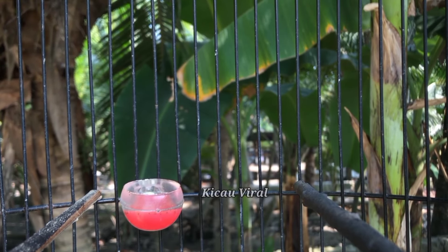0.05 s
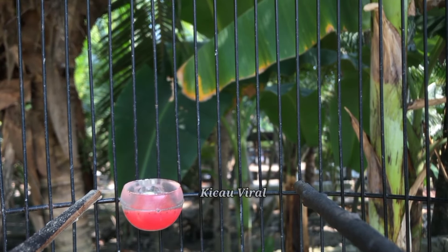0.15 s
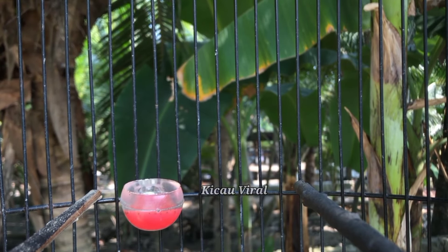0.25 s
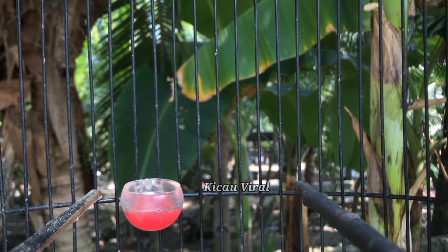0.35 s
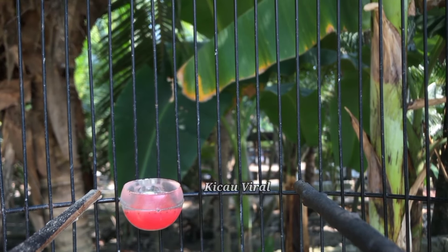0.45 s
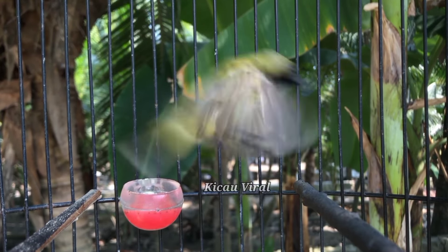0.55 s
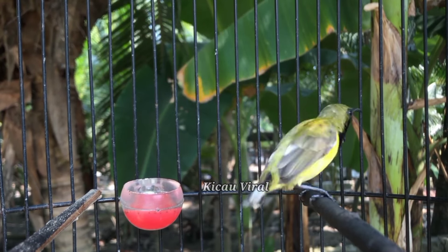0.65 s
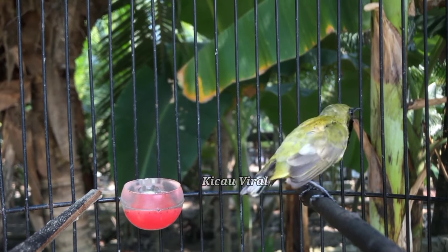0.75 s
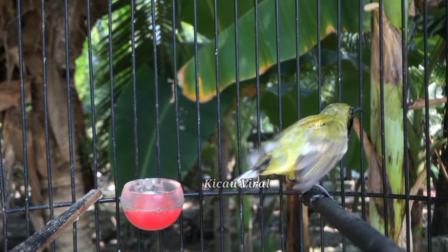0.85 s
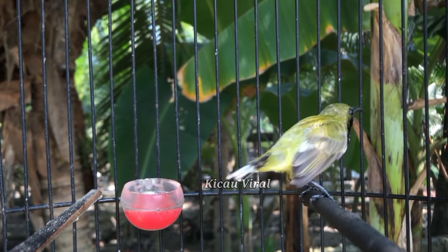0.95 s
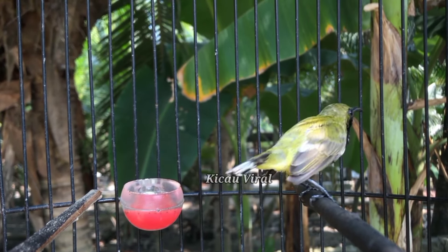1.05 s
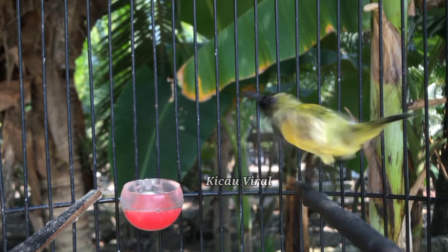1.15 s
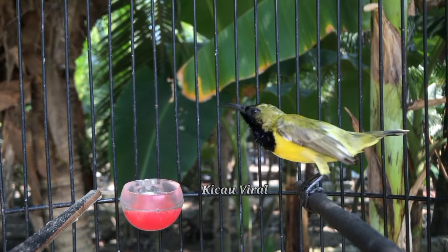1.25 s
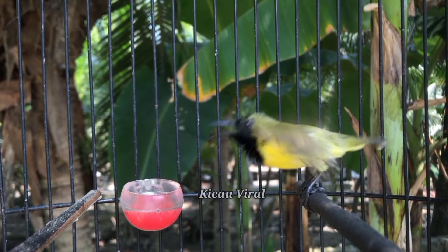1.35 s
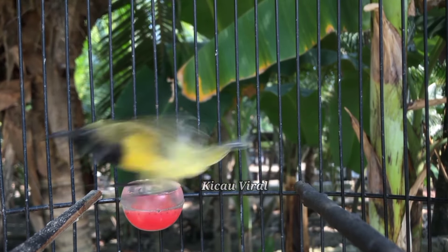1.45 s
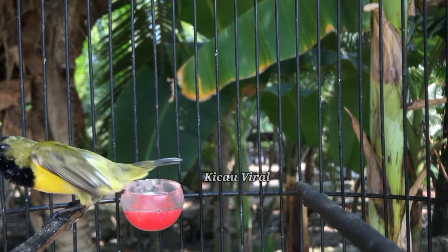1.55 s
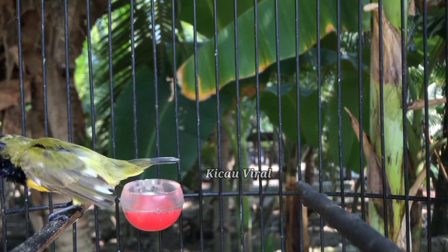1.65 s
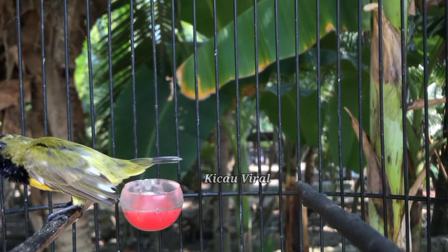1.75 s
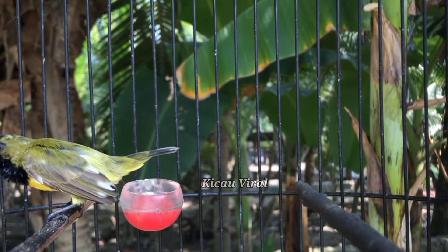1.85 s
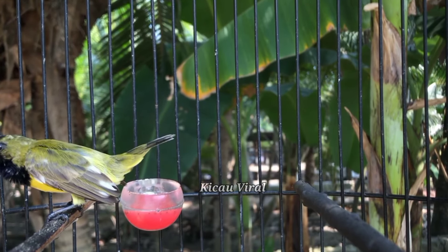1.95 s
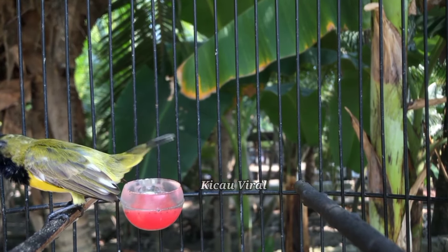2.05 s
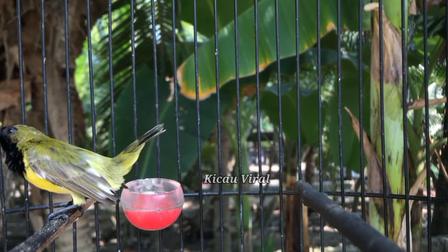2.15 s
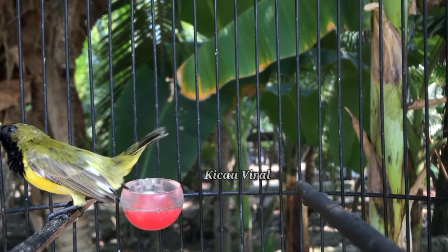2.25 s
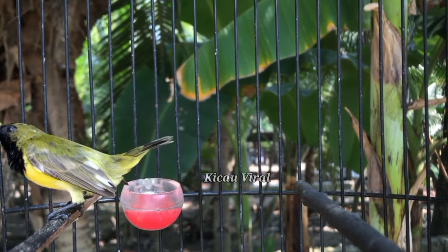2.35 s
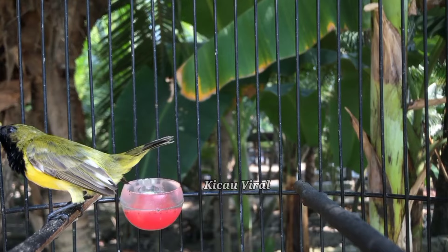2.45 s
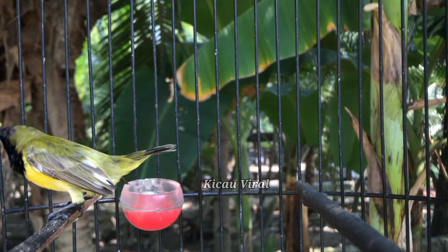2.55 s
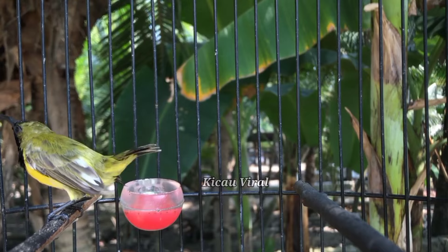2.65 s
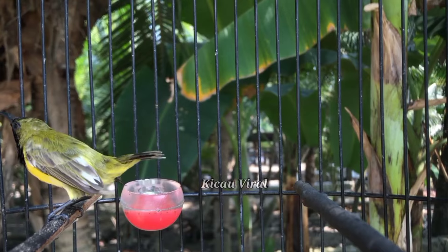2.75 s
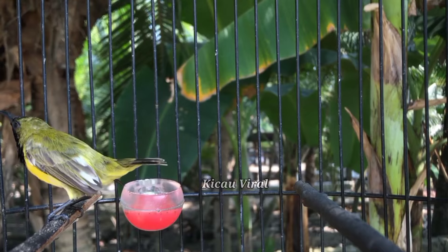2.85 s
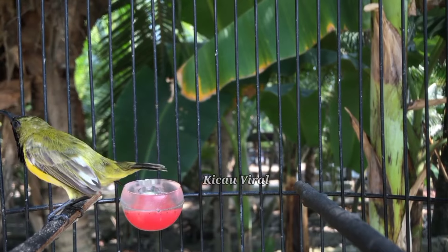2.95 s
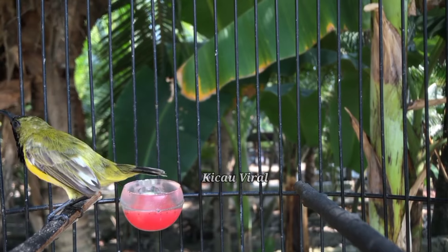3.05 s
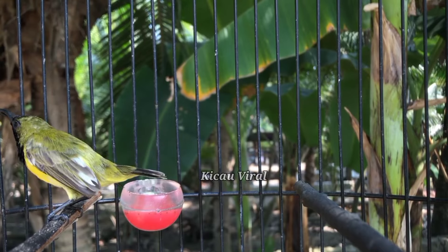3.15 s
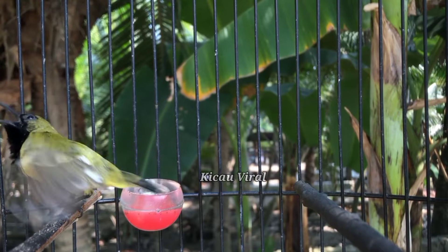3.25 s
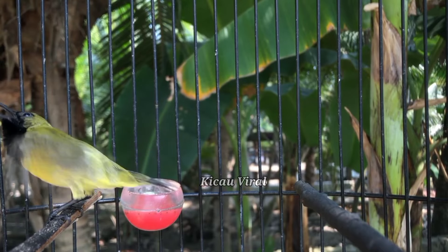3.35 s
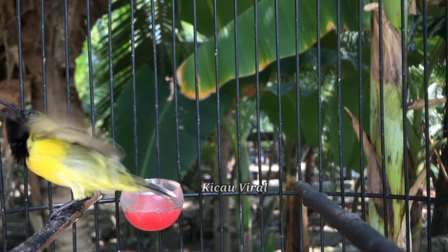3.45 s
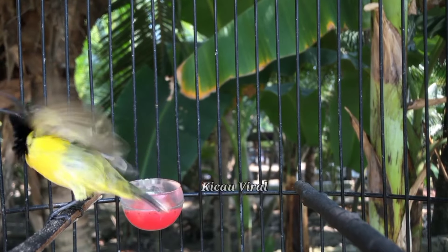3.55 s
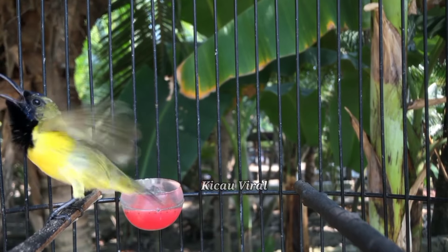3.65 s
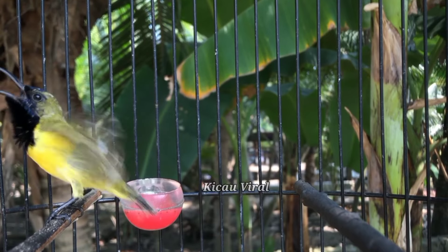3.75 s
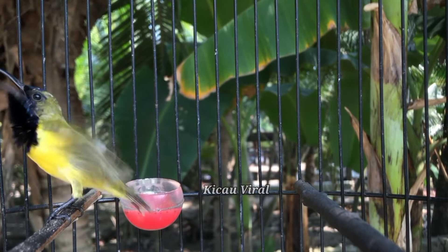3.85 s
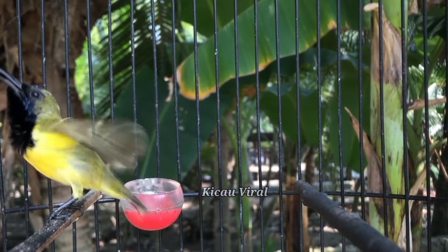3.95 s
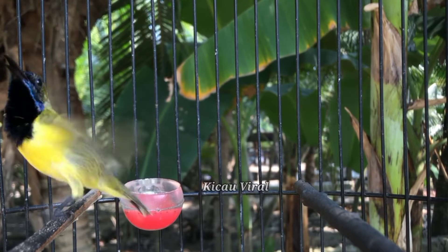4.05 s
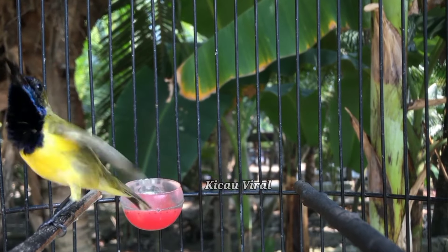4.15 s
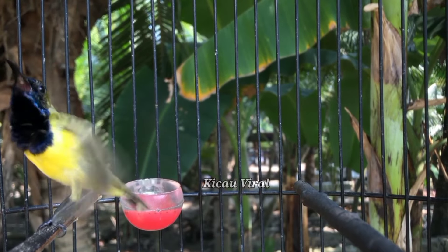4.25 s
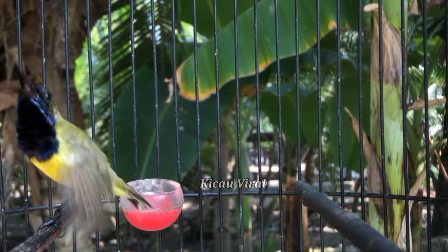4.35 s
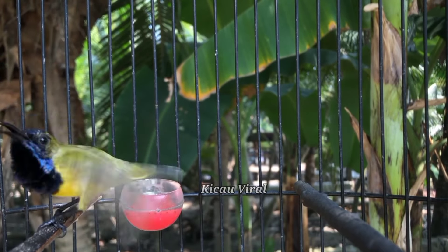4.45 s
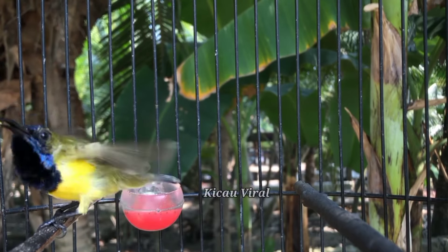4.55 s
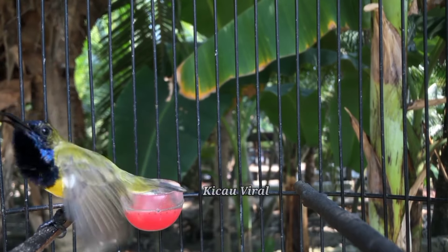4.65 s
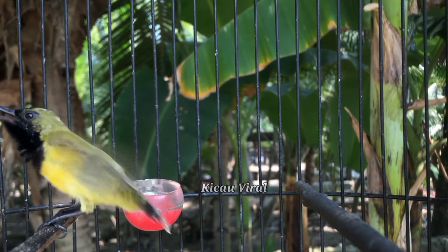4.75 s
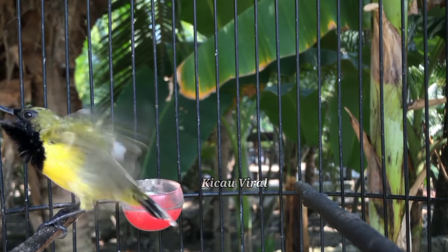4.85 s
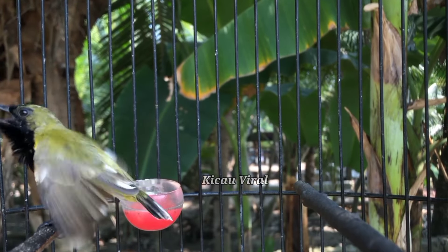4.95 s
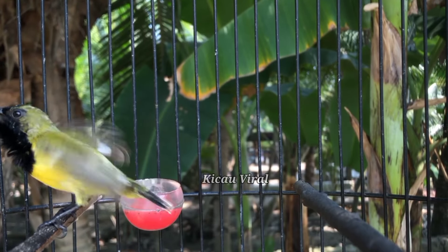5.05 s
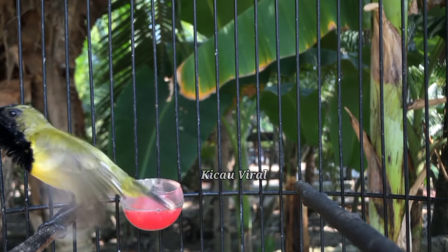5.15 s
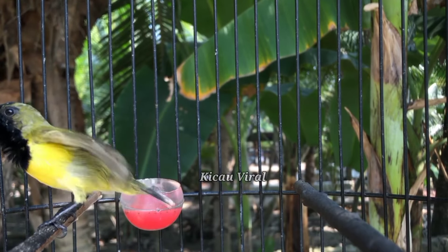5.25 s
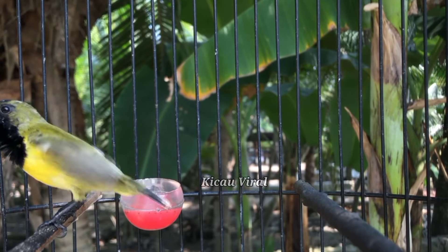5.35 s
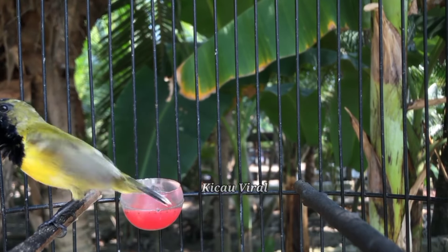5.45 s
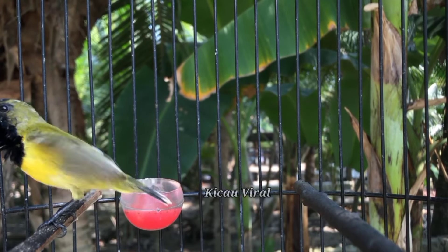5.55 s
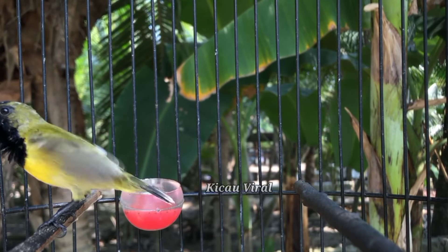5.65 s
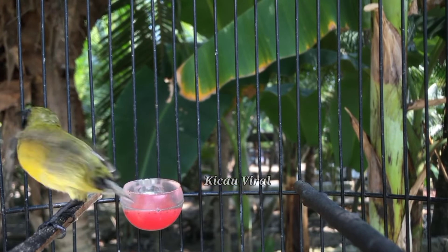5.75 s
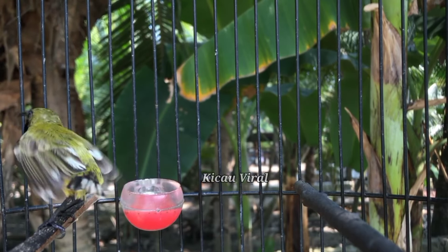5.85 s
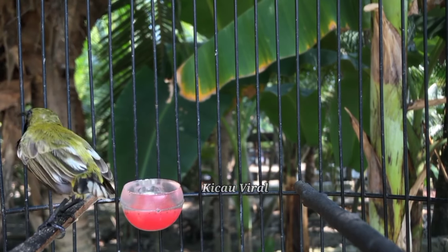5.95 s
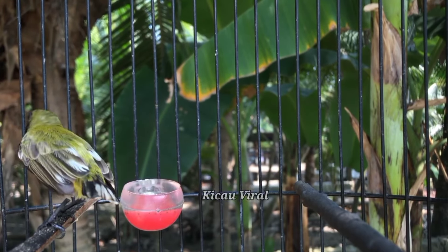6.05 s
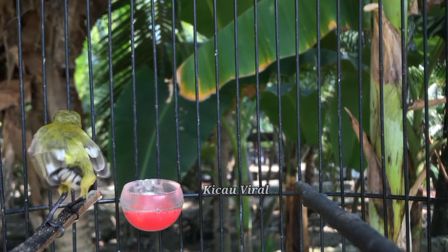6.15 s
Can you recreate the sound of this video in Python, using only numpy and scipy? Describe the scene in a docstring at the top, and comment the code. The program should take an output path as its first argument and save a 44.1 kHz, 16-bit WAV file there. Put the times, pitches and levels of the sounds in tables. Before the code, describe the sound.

A small bird flutters onto a perch in a wire cage, gives sharp chips, then bursts into a loud, rapid, piercing trill outdoors.

```python
"""The fading tail of an earlier high chirp opens over a low outdoor rumble, steady air and a faint hum.
A caged sunbird flits to its perch, gives two sharp chips, then a warble, two upslurs and a long fast trill.
Its voice is a harmonic stack swept through one tuned throat resonance, loud enough that its highest crests clip.
Wings and feathers are decaying noise with a low push of air, the wire cage is a set of ringing modes,
and the other garden birds are near-sine slurs blurred by scattered echoes."""
import sys
import numpy as np
from scipy import signal
from scipy.fft import rfft, irfft
from scipy.io import wavfile
from scipy.ndimage import uniform_filter1d

SR = 44100
rng = np.random.default_rng(int(sys.argv[2]) if len(sys.argv) > 2 else 0)


def bounce(signal):
    """Save signal as a 16-bit WAV file at the path given by the first command-line argument."""
    frames = np.transpose(np.atleast_2d(signal))
    limited = np.clip(frames, -1, 1)
    pcm = np.round(limited * 32767).astype(np.int16)
    wavfile.write(sys.argv[1], SR, pcm)


N = 273861

# colour of the steady air, the low rumble and the soft rustle: (frequency [Hz], relative density [dB])
AIR_SPECTRUM = [(59, -27.5), (100, -1.5), (188, -10), (588, -22.5), (790, -23.5), (1180, -18), (2000, -25),
                (2420, -22), (3180, -22.5), (4750, -27), (6650, -25.5), (7870, -33.5), (10400, -34),
                (11300, -29.5), (15500, -33)]
RUMBLE_SPECTRUM = [(12, -41), (20, -18), (65, 7.5), (81, 3.5), (103, -11.5), (140, -6.5), (180, -32.5),
                   (310, -120)]
RUSTLE_SPECTRUM = [(100, -21), (170, 0), (330, 2), (450, 1), (700, -3.5), (1200, -9.5), (2000, -24.5)]
AIR_DB = -58.5
# the rumble eases slowly and wavers
RUMBLE_START_DB, RUMBLE_DB_PER_S, RUMBLE_WAVER_DB = -50.5, -1, 2
# low washes of air from the bird's wings as it lands and flits: (time [s], half length [s], rise [dB])
WING_WASH = [(0.713, 0.045, 14.5), (6.147, 0.12, 13)]
# how the rustle comes and goes: (time [s], relative level [dB])
RUSTLE_LEVEL = [(0, -55), (.62, -55), (.72, -40.5), (.9, -58), (1.25, -56), (1.31, -52), (1.6, -54),
                (1.65, -50), (1.85, -55.5), (2.7, -57), (3.5, -62), (5.1, -64.5), (5.5, -51.5), (5.9, -59),
                (6.2, -50)]
# tones of a faint hum: (frequency [Hz], relative level [dB])
HUM_TONES = [(393, -75), (431, -65), (589, -75.5), (716, -73)]
# the hum fades early on: (time [s], gain [dB])
HUM_LEVEL = [(0, 5), (1.4, 3), (2.1, -11.5), (6.2, -14.5)]

# other birds in the garden, the first two rows being the tail of the earlier chirp:
# (time [s], length [s], start pitch [Hz], middle pitch [Hz], end pitch [Hz], relative level [dB])
FAR_CALLS = [(0, 0.0092, 7640, 7120, 6460, -27), (.002, 0.013, 7160, 6240, 5600, -39),
             (0.595, 0.037, 6960, 6730, 6850, -56), (1.132, 0.064, 3570, 3017, 2430, -41),
             (1.307, 0.037, 3190, 2796, 2360, -40), (1.33, 0.13, 7080, 6320, 6600, -59),
             (1.42, 0.11, 2800, 2438, 2170, -48.5), (1.61, 0.15, 2400, 2110, 1720, -52.5),
             (1.745, 0.14, 4280, 4280, 4420, -61), (1.935, 0.16, 8770, 6950, 6630, -60),
             (2.03, 0.039, 6700, 6110, 5680, -53.5), (2.265, 0.084, 5430, 5900, 5930, -58.5),
             (2.535, 0.11, 8130, 6650, 6560, -55.5), (2.62, 0.2, 1260, 1322, 1287, -63),
             (2.735, 0.051, 3500, 3373, 3470, -53), (2.79, 0.083, 3800, 3980, 4350, -59.5),
             (2.839, 0.047, 5310, 6010, 5620, -50), (2.929, 0.11, 2505, 2830, 3080, -57.5),
             (3.11, 0.14, 7830, 6750, 6500, -56.5), (3.43, 0.084, 1300, 1380, 1320, -63),
             (4.881, 0.081, 290, 326, 312, -55.5), (4.881, 0.12, 188, 168.8, 165, -56.5),
             (5.44, 0.19, 345, 352, 334, -57.5), (5.62, 0.16, 3780, 3770, 3670, -38.5),
             (5.89, 0.063, 2995, 3244, 3740, -35.5), (5.94, 0.057, 3650, 3590, 3260, -40.5),
             (5.95, 0.085, 398, 351, 342, -51.5), (6.08, 0.092, 2940, 2713, 2920, -40),
             (6.09, 0.08, 287, 290.5, 300, -53.5), (6.154, 0.063, 3180, 3625, 3730, -34.5),
             (6.13, 0.083, 6000, 6480, 6450, -62)]

# wing beats and feather flicks: (time [s], relative level [dB], time to fall 60 dB [s])
FLICKS = [(0.27, -41, 0.4), (0.661, -32.5, 0.05), (0.689, -27.5, 0.025), (0.718, -32, 0.089),
          (.731, -33, 0.032), (0.751, -39, .03), (1.285, -41.5, 0.107), (1.317, -39.5, 0.09),
          (1.624, -31, 0.077), (2.38, -49.5, 0.44)]
# feet landing on a perch shake the cage: (time [s], relative level [dB])
LANDINGS = [(.728, -50.5), (1.28, -55), (1.627, -48), (2.575, -70)]
# ringing modes of the wire cage: (frequency [Hz], relative level [dB], time to fall 60 dB [s])
CAGE_MODES = [(466, -4.5, 0.44), (592, -1, .5), (662, -3, 1), (680, -4, 0.39), (940, -9.5, 0.16),
              (1070, -6, 0.53), (1140, -5.5, 0.87), (1310, -6.5, .25), (1590, -2, .12), (2280, 2, .1)]

# strength of harmonics 1, 2, 3, .. as they drive the throat: one entry each (relative level [dB])
HARMONICS_DB = [-0.5, -1, -6, -13.5, -21, -21, -22.5, -27, -27]
# what passes beside the throat resonance: (frequency [Hz], gain [dB])
THROAT_LEAK = [(1500, -30), (2500, -42), (3600, -33.5), (5000, -32), (7500, -33.5), (9000, -24),
               (10500, -38), (12500, -33.5), (14500, -30), (16000, -38)]
# how the throat is tuned to the slurs: (pitch [Hz], throat resonance [Hz])
THROAT_TUNING = [(2900, 6100), (3600, 7000), (5500, 6450)]

# chips and upslurs, each a lead-in that leaps to a crest and falls away:
# (start time [s], crest time [s], leap length [s], lead-in glide [Hz/s], opening scoop [Hz],
#  crest pitch [Hz], lead-in level [dB], crest level [dB], beak gape [dB])
SLURS = [(0.8539, .890, .0095, 2, 1.5, 6500, -9, -6, 21.5),
         (1.47, 1.504, 0.011, 2, 0.5, 6930, -3, -4.5, 11.5),
         (3.508, 3.585, 0.0098, 16997, 1199, 7050, -3.5, -1, 7),
         (3.655, 3.739, 0.011, 14997, 1305, 7110, -1, -2.5, -1.5)]
LEAP_FROM_HZ, FALL_S, FALL_TO_HZ = 3660, 0.014, 1730  # the leap and the fall are bell-shaped
SLUR_ATTACK_S, SLUR_TAIL_S, SLUR_RELEASE_S = 0.0033, .032, .012
SWELL_DB, FALL_DB_PER_S = 13, 330.5  # the lead-in swells, the fall fades
# the voice weakens as it crosses between its two registers
BREAK_HZ, BREAK_WIDTH_HZ, BREAK_DB = 4400, 900, -5.5
# the other side of the syrinx holds a faint lower tone under the crest, set relative to the crest level
SECOND_VOICE_HZ, SECOND_VOICE_DB = 4600, -25.5

# the warble, a rising note with a fast vibrato:
# (time [s], centre pitch [Hz], vibrato depth [Hz], level [dB])
WARBLE = [(3.354, 1920, 202, -22), (3.358, 2308, 400.5, -18), (3.369, 2825, 446, -5),
          (3.372, 4350, 1398, -11.5), (3.388, 6250, 1104, -1), (3.408, 6960, 796, 0),
          (3.421, 7360, 197, -2.5), (3.432, 6850, 0.5, -28)]
VIBRATO_HZ = 113

# trill syllables:
# (crest time [s], time stretch [ratio], shoulder pitch [Hz], crest pitch [Hz],
#  crest level [dB], descent level [dB])
TRILL = [(3.835, 1.18, 2727, 3080, 0.5, -6.5), (3.921, 0.92, 2647, 3130, 4, -6.5),
         (4.004, 0.98, 2676, 3243, -0.5, -6), (4.086, 0.91, 2640, 3068, 2, -8.5),
         (4.169, 0.99, 2616, 3133, 3.5, -5), (4.255, 0.92, 2537, 3067, 3, -7),
         (4.341, 0.97, 2520, 3218, 3, -7.5), (4.424, 0.91, 2553, 3054, 0, -6),
         (4.505, 1.02, 2706, 3310, -1.5, -5), (4.59, 1.08, 2513, 3130, -2.5, -12),
         (4.677, 1.02, 2394, 3066, -2, -11), (4.766, 1.04, 2486, 3010, -1.5, -9),
         (4.854, 0.96, 2513, 3133, 2, -9.5), (4.939, 1.05, 2420, 2955, -5, -10.5),
         (5.027, 1.12, 2546, 3165, -2.5, -10.5), (5.114, 1.09, 2545, 3145, -2, -9),
         (5.2, .93, 2520, 3084, -2, -9), (5.285, 1.055, 2450, 3160, -0.5, -10),
         (5.373, 1, 2383, 2940, -3.5, -9.5), (5.465, 1.016, 2323, 2944, -2, -10),
         (5.567, 0.97, 2245, 2890, -3.5, -10.5), (5.655, 1.02, 2400, 3190, -1.5, -7),
         (5.745, 1.06, 2406, 2990, -2, -7.5), (5.849, 1, 2165, 2897, -3.5, -13)]
# a syllable is a broad arch of pitch (the shoulder) with a brief flick up to the crest;
# its times and rates hold at a stretch of 1
SYLLABLE_LEAD_S, SYLLABLE_TAIL_S = .028, .031
SYLLABLE_ATTACK_S, SYLLABLE_RELEASE_S = .012, 0.0098
SHOULDER_LAG_S, SHOULDER_WIDTH_S, CREST_WIDTH_S = .0042, 0.037, .0058
RISE_DB, FLANK_SHARE, LOUD_S = -5.5, 0.23, 0.0067  # the rise follows the crest level only in part
DESCENT_DB_PER_S = 195.5  # the descent fades as it goes
# it goes down in steps, weak at each drop
FIRST_STEP_S, STEP_S, STEP_HZ, STEP_DB = 0.01017, 0.01124, 60, 3.5
# the throat sinks with the descent
THROAT_RISE_HZ, THROAT_END_HZ, THROAT_CLOSE_S, THROAT_EASE_S = 6440, 4690, 0.0091, 0.0076

# hard surfaces close to the bird: (delay [s], gain [ratio])
NEAR_ECHOES = [(.0019, 0.057), (.0034, -0.11), (.0058, .09), (.0093, 0.098)]
# how long the garden tail rings: (frequency [Hz], time to fall 60 dB [s])
GARDEN_DECAY = [(500, 0.42), (3000, .55), (7000, 0.42), (9000, 0.17), (15000, 0.069)]
BAND_LIMIT_HZ = 15700


def amp(db):
    """Decibels to gain."""
    return 10 ** (np.asarray(db) / 20)


def unit(x):
    """Scales to rms 1."""
    return x / np.sqrt(np.mean(x ** 2) + 1e-20)


def read(points, hz):
    """Reads a table of (frequency [Hz], value) on a log-frequency axis."""
    f, value = np.transpose(points)
    return np.interp(np.log(hz + 1), np.log(f + 1), value)


def follow(rows, t):
    """Each column of a table of curves at the times t."""
    s, *columns = np.transpose(rows)
    return [np.interp(t, np.maximum.accumulate(s), c) for c in columns]


def add(mix, s, sound):
    """Mixes a sound in at time s."""
    part = mix[max(round(s * SR), 0):][:len(sound)]
    part += sound[:len(part)]


def noise(spectrum, size):
    """Noise of rms 1 with the given spectrum."""
    hz = np.fft.rfftfreq(size, 1 / SR)
    white = rfft(rng.standard_normal(size))
    return unit(irfft(white * amp(read(spectrum, hz)), size))


def waver(size, rate_hz):
    """Smooth random drift of rms 1; motion faster than the given rate is rolled off."""
    hz = np.fft.rfftfreq(size, 1 / SR)
    white = rfft(rng.standard_normal(size))
    return unit(irfft(white / (1 + (hz / rate_hz) ** 4), size))


def bell(t, width, steep=2):
    """A hump of height 1 around zero."""
    return np.exp(-abs(t / width) ** steep)


def gate(t, attack_s, release_s):
    """Smooth attack, hold and release over the times t."""
    attack = np.sin(np.pi / 2 * np.clip((t - t[0]) / attack_s, 0, 1))
    release = np.sin(np.pi / 2 * np.clip((t[-1] - t) / release_s, 0, 1))
    return (attack * release) ** 2


def reverb(x, t60s):
    """Scattered echoes of unit energy; each band dies at its own speed."""
    hz, t, z = signal.stft(rng.standard_normal(SR), SR, nperseg=256)
    decay = 1000 ** (-t / read(t60s, hz)[:, None])
    tail = signal.istft(z * decay, SR, nperseg=256)[1]
    return signal.fftconvolve(x, tail / np.linalg.norm(tail))[:N]


def outdoors(rustle_db=-4, hum_wander_rad=3.0, whine_db=-77):
    """Steady air, a low rumble with washes of air from the wings, a soft distant rustle, a wavering hum and a
    thin high whine."""
    t = np.arange(N) / SR
    air = amp(AIR_DB) * noise(AIR_SPECTRUM, N)
    swell_db = sum(db * bell(t - s, width) for s, width, db in WING_WASH)
    rumble_db = RUMBLE_START_DB + RUMBLE_DB_PER_S * t + swell_db + RUMBLE_WAVER_DB * waver(N, 4)
    rumble = noise(RUMBLE_SPECTRUM, N) * amp(rumble_db)
    rustle = noise(RUSTLE_SPECTRUM, N) * amp(rustle_db + follow(RUSTLE_LEVEL, t)[0])
    hum = np.zeros(N)
    for hz, db in HUM_TONES:
        phase = 2 * np.pi * hz * t + hum_wander_rad * waver(N, 6.9)
        hum += amp(db) * np.sqrt(2) * np.sin(phase)
    hum *= amp(follow(HUM_LEVEL, t)[0])
    whine = amp(whine_db) * noise([(10700, -60), (11400, -0.5), (12100, -60)], N)
    return air + rumble + rustle + whine + hum


def far_birds(direct_db=-6.0, wet_db=0, wobble=0.016):
    """Near-sine slurs, each bent through three pitches and blurred by the garden."""
    calls = np.zeros(N)
    for s, length, start_hz, mid_hz, end_hz, db in FAR_CALLS:
        u = np.linspace(0, 1, int(length * SR))
        curve = np.polyfit([0, .5, 1], [start_hz, mid_hz, end_hz], 2)
        pitch = np.polyval(curve, u) * (1 + wobble * waver(len(u), 220))
        tone = np.sin(2 * np.pi * np.cumsum(pitch) / SR)
        add(calls, s, amp(db) * tone * signal.windows.tukey(len(u), .5))
    blurred = reverb(calls, [(2500, 0.44), (7000, 0.36), (12000, 0.29)])
    return amp(direct_db) * calls + amp(wet_db) * blurred


def movement(flick_db=-6, push_db=-6, push_hz=70):
    """Feathers snap and push a little air; landings ring the wire cage."""
    out, t = np.zeros(N), np.arange(SR // 2) / SR
    feathers = [(200, -4), (1500, -2), (4000, 0), (7000, 0), (10000, -4), (14500, -1)]
    for s, db, t60 in FLICKS:
        snap = noise(feathers, len(t)) * 1000 ** (-t / t60)
        push = np.sin(2 * np.pi * push_hz * t) * np.exp(-t / .02)
        add(out, s, amp(db) * (amp(flick_db) * snap + amp(push_db) * push))
    for s, db in LANDINGS:
        ring = np.zeros(len(t))
        for hz, mode_db, t60 in CAGE_MODES:
            mode = np.sin(2 * np.pi * (hz * t + rng.random()))
            ring += amp(mode_db) * 1000 ** (-t / t60) * mode
        add(out, s, amp(db) * ring * np.minimum(t / 0.0017, 1))
    return out


def syrinx(pitch, level_db, throat_hz, gape_db=0, throat_width_hz=2000, jitter=0.0025, shimmer=.035,
           hiss_db=-35, hiss_follow=0.37, moving_db=9, moving_rate=45, pure_db=10):
    """A harmonic stack; whichever harmonic crosses the throat resonance carries the note.
    A wide gape lets the others out."""
    size = len(pitch)
    pitch = uniform_filter1d(pitch, size=70)
    pitch_speed = abs(np.gradient(np.log(pitch))) * SR
    moving = np.tanh(uniform_filter1d(pitch_speed, size=150) / moving_rate)
    phase = 2 * np.pi * np.cumsum(pitch * (1 + jitter * waver(size, 650))) / SR
    k = 1 + np.arange(len(HARMONICS_DB))[:, None]
    hz = k * pitch
    throat = 1 / (1 + (2 * (hz - throat_hz) / throat_width_hz) ** 4)
    high = np.clip(pitch / 4000 - 1, 0, .5) * 2  # the highest notes are almost pure sines
    opened_db = gape_db * np.interp(hz, [4000, 15000], [1, .65])  # the gape frees the low harmonics most
    leak = amp(read(THROAT_LEAK, hz) + opened_db - pure_db * high)
    gains = (throat * amp(HARMONICS_DB)[:, None] + leak) * (hz < SR / 2)
    # the note dips where no harmonic lies in the resonance
    evening = np.hypot(np.linalg.norm(throat + leak, axis=0), .3)
    tone = (gains * np.sin(k * phase)).sum(0) / evening
    voiced = tone * amp(level_db) * (1 + shimmer * waver(size, 350))
    # a faint hiss follows the level and grows while the pitch moves fast
    hiss_spectrum = [(700, -23.5), (2500, -13.0), (4500, -1.5), (6500, 3.5), (9000, -1.5),
                     (11000, -12.0), (14500, -2.0)]
    hiss = noise(hiss_spectrum, size) * amp(hiss_db + moving_db * moving + hiss_follow * level_db)
    return (voiced + hiss) * signal.windows.tukey(size, .06)


def slurs(closing_s=.05, leap_steep=4, fall_steep=2.5, flutter_db=2.14, flutter_hz=130,
          wobble=0.014, wobble_hz=110):
    """Chips and upslurs: the second harmonic carries the lead-in, then the pitch leaps
    until the fundamental reaches the throat resonance."""
    out = np.zeros(N)
    for start, crest, leap_s, glide, scoop_hz, crest_hz, lead_db, crest_db, gape_db in SLURS:
        t = np.arange(start - crest, SLUR_TAIL_S, 1 / SR)  # zero at the crest
        age = t - t[0]
        lead_hz = LEAP_FROM_HZ + glide * (t + leap_s) - scoop_hz * bell(age, .013)
        arch = np.where(t < 0, bell(t, leap_s, leap_steep), bell(t, FALL_S, fall_steep))
        pitch = crest_hz * arch + np.where(t < 0, lead_hz, FALL_TO_HZ) * (1 - arch)
        pitch = pitch * (1 + wobble * waver(len(t), wobble_hz))
        swelling_db = lead_db - SWELL_DB * (1 - age / (crest - start - leap_s)) ** 2
        rising_db = crest_db * arch + swelling_db * (1 - arch)
        level_db = np.where(t < 0, rising_db, crest_db - FALL_DB_PER_S * t)
        level_db = level_db + BREAK_DB * bell(pitch - BREAK_HZ, BREAK_WIDTH_HZ)
        level_db = level_db + flutter_db * waver(len(t), flutter_hz)
        note = syrinx(pitch, level_db, read(THROAT_TUNING, pitch), gape_db * bell(age, closing_s))
        second_hz = SECOND_VOICE_HZ * (1 + 2 * wobble * waver(len(t), wobble_hz))
        second = np.sin(2 * np.pi * np.cumsum(second_hz) / SR)
        note = note + amp(crest_db + SECOND_VOICE_DB) * arch * second
        add(out, start, note * gate(t, SLUR_ATTACK_S, SLUR_RELEASE_S))
    return out


def warble(gape_db=10, closing_s=0.1, throb_db=2, throat_low_hz=6350):
    """The note that opens the song: louder on each upswing of the vibrato;
    the throat rises with it near the top."""
    out, t = np.zeros(N), np.arange(WARBLE[0][0], WARBLE[-1][0], 1 / SR)
    centre_hz, depth_hz, level_db = follow(WARBLE, t)
    swing = np.cos(2 * np.pi * VIBRATO_HZ * (t - t[0]))
    gape = gape_db * bell(t - t[0], closing_s)
    throat_hz = np.maximum(centre_hz, throat_low_hz)
    add(out, t[0], syrinx(centre_hz + depth_hz * swing, level_db + throb_db * swing, throat_hz, gape))
    return out


def trill(wobble=.01, wobble_hz=120, flutter_db=2.4, flutter_hz=200, crest_steep=2.7,
          shoulder_steep=2.6, edge_db=-32):
    """One arch about twelve times a second: the third harmonic rings on the way up,
    the second from the crest down."""
    out = np.zeros(N)
    for s, stretch, shoulder_hz, crest_hz, crest_db, descent_db in TRILL:
        t = np.arange(-SYLLABLE_LEAD_S, SYLLABLE_TAIL_S, 1 / (SR * stretch))  # zero at the crest
        flick, loud = bell(t, CREST_WIDTH_S, crest_steep), bell(t, LOUD_S, crest_steep)
        steps = -np.cos(2 * np.pi * (t - FIRST_STEP_S) / STEP_S) * (t > 0)
        shoulder = bell(t - SHOULDER_LAG_S, SHOULDER_WIDTH_S, shoulder_steep)
        flank_hz = shoulder_hz * shoulder + STEP_HZ * steps
        pitch = crest_hz * flick + flank_hz * (1 - flick)
        rising_db = RISE_DB + FLANK_SHARE * crest_db
        falling_db = descent_db + STEP_DB * steps - DESCENT_DB_PER_S * t
        flank_db = np.where(t < 0, rising_db, falling_db)
        edges = 1 - np.sqrt(gate(t, SYLLABLE_ATTACK_S, SYLLABLE_RELEASE_S))
        level_db = crest_db * loud + flank_db * (1 - loud) + edge_db * edges
        sinking = (1 + np.tanh((t - THROAT_CLOSE_S) / THROAT_EASE_S)) / 2
        throat_hz = THROAT_RISE_HZ + (THROAT_END_HZ - THROAT_RISE_HZ) * sinking
        # no two syllables are quite alike: pitch and strength flutter a little
        pitch = pitch * (1 + wobble * waver(len(t), wobble_hz))
        level_db = level_db + flutter_db * waver(len(t), flutter_hz)
        add(out, s + t[0] * stretch, syrinx(pitch, level_db, throat_hz))
    return out


def scene(cage_db=-26, garden_db=-32):
    """The close bird with its near echoes, a short cage reverb and a faint garden tail, over everything else."""
    voice = slurs() + warble() + trill()
    bird = voice.copy()
    for delay, gain in NEAR_ECHOES:
        add(bird, delay, gain * voice)
    cage = reverb(voice, [(1000, .05), (15000, .05)])
    garden = reverb(voice, GARDEN_DECAY)
    bird += amp(cage_db) * cage + amp(garden_db) * garden
    return (outdoors() + far_birds() + movement() + bird)[None]


def record(dry, lopsided=.003):
    """The loudest crests clip, a little sooner on one side, which leaves a soft thump; then the band limit."""
    clipped = np.clip(dry, -.94, .94 - lopsided)
    lowpass = signal.firwin(401, BAND_LIMIT_HZ, window=("kaiser", 8), fs=SR)
    return signal.oaconvolve(clipped, lowpass[None], "same")


dry = scene()
out = record(dry)
bounce(out)
```